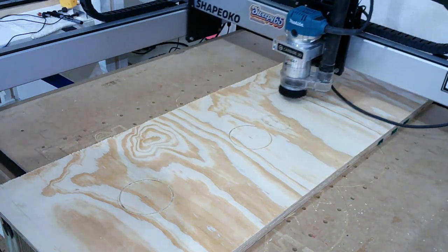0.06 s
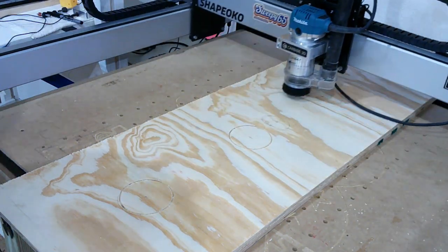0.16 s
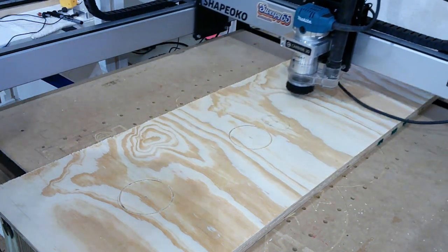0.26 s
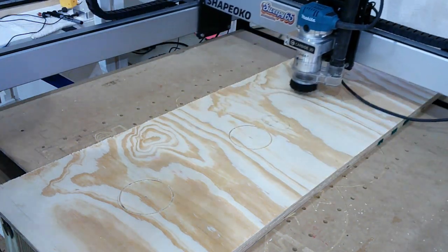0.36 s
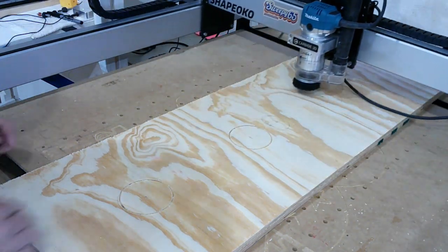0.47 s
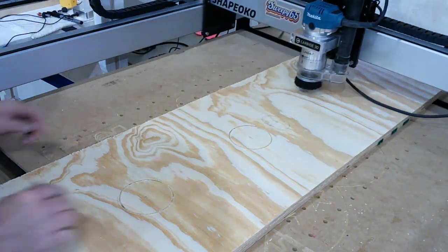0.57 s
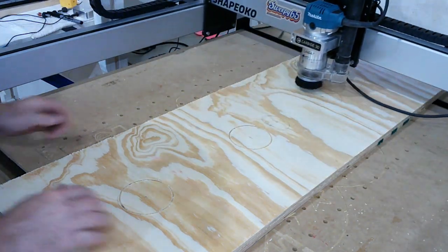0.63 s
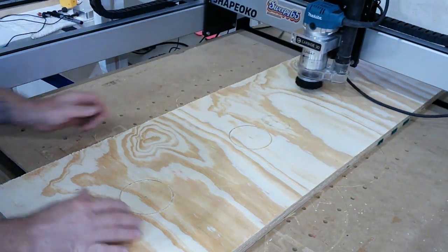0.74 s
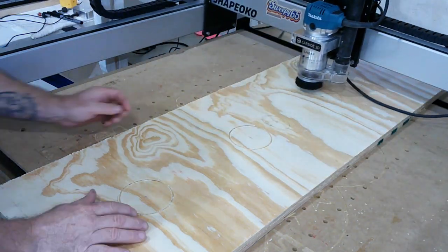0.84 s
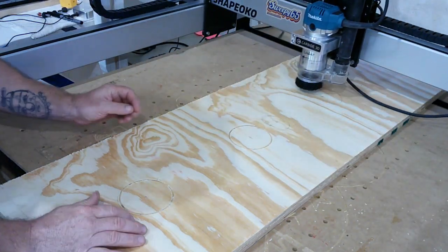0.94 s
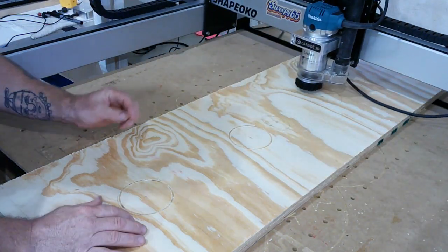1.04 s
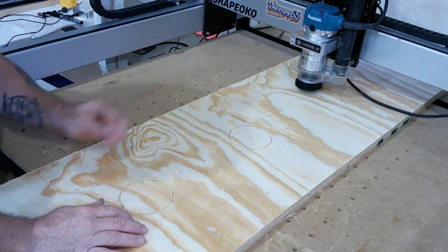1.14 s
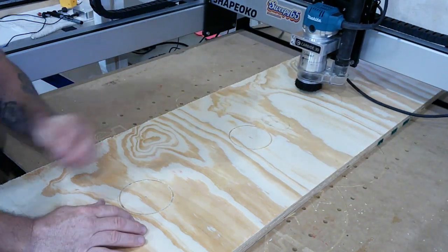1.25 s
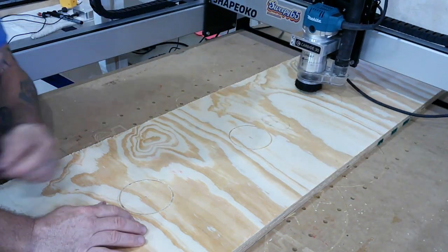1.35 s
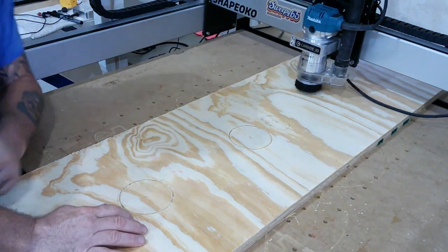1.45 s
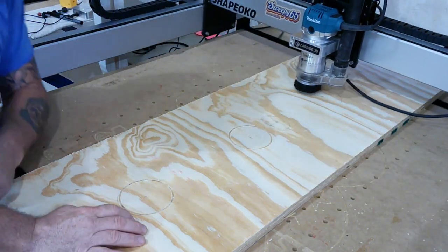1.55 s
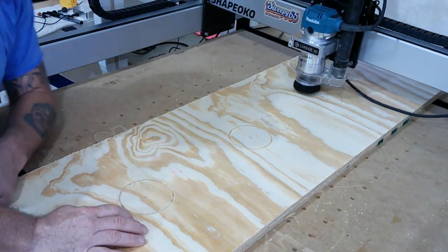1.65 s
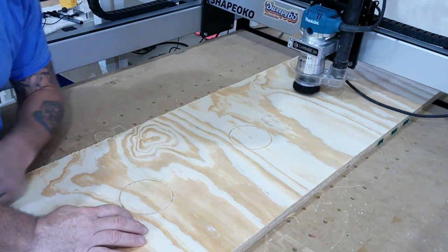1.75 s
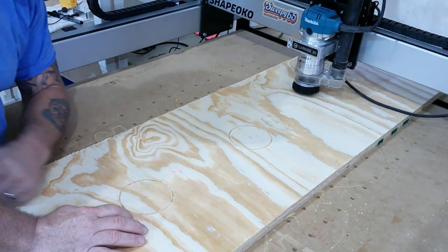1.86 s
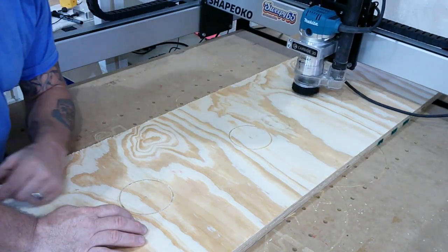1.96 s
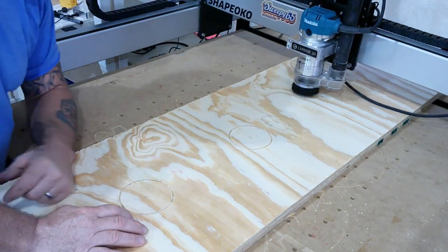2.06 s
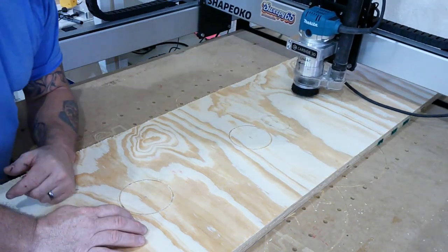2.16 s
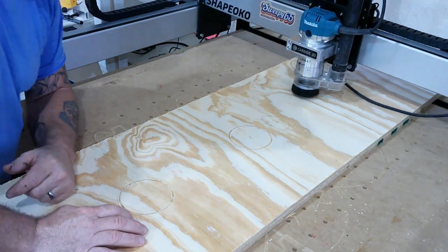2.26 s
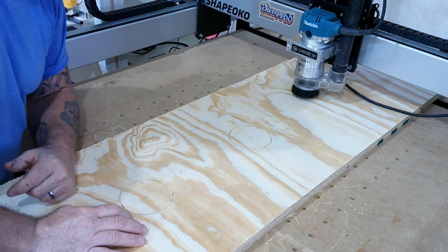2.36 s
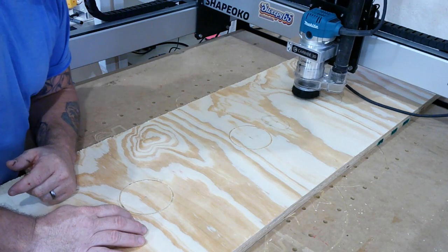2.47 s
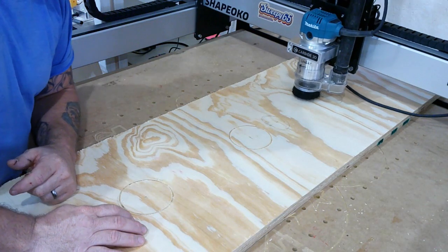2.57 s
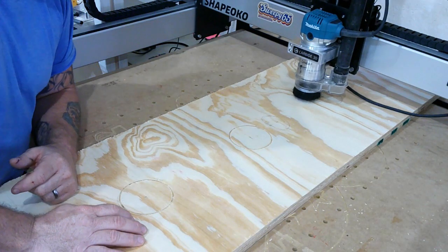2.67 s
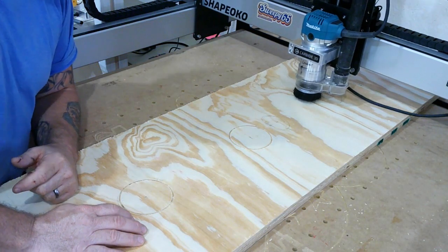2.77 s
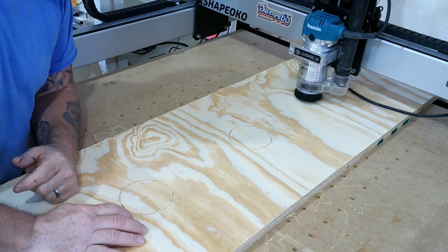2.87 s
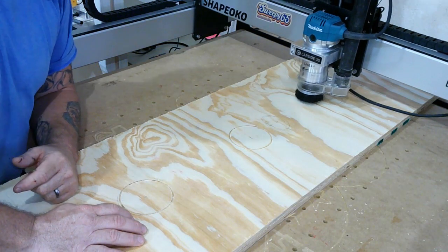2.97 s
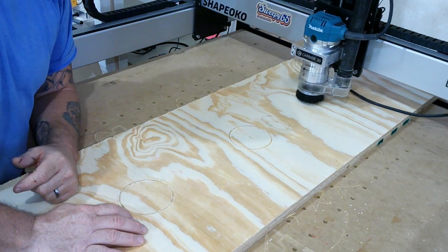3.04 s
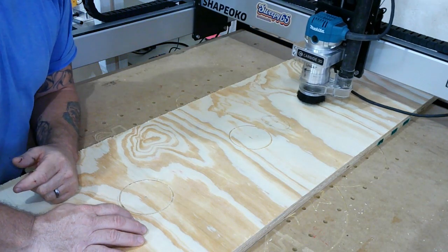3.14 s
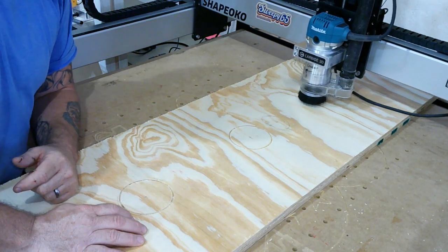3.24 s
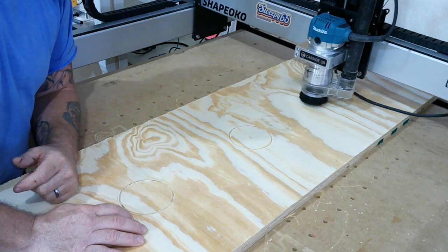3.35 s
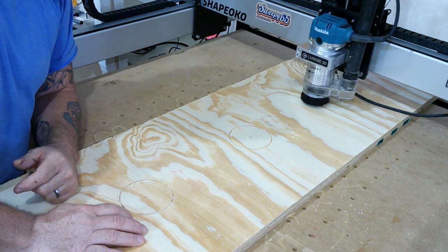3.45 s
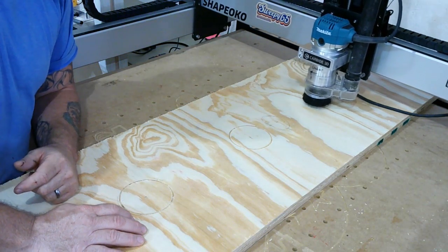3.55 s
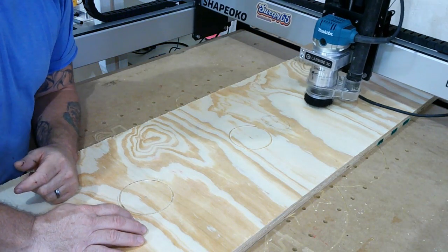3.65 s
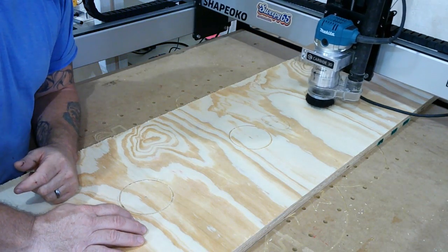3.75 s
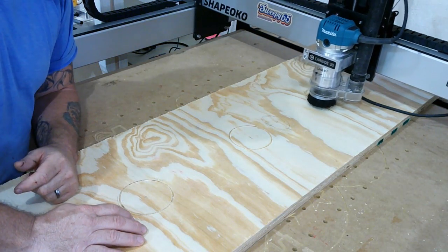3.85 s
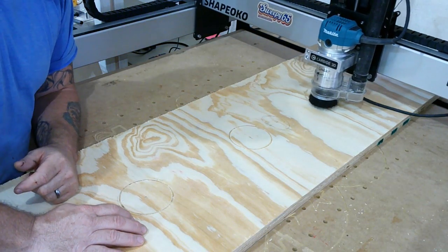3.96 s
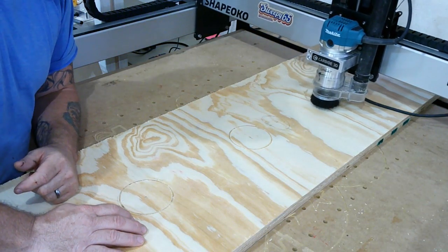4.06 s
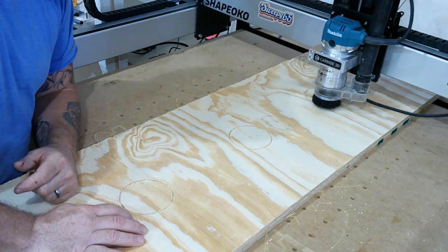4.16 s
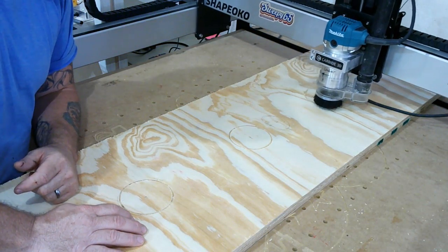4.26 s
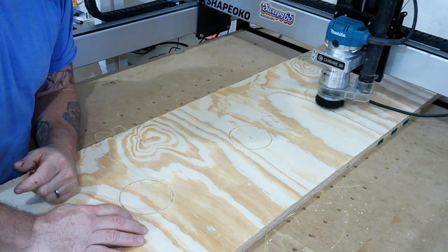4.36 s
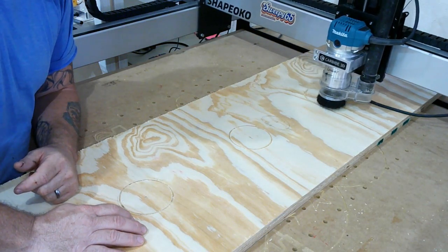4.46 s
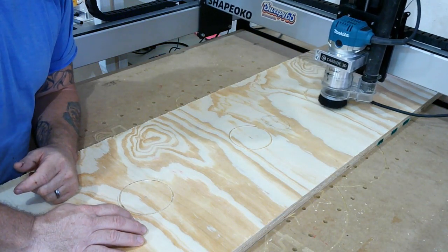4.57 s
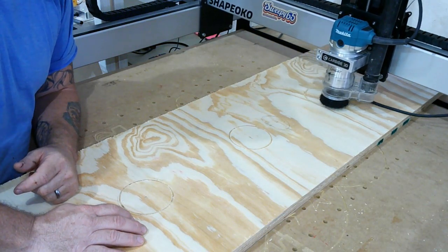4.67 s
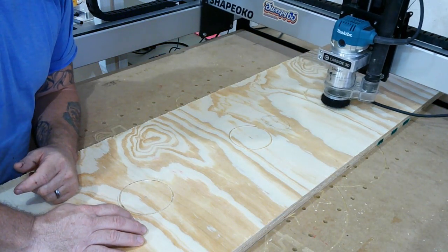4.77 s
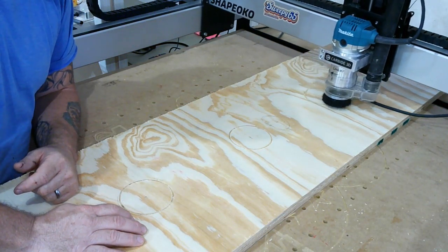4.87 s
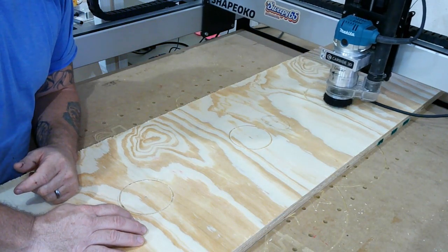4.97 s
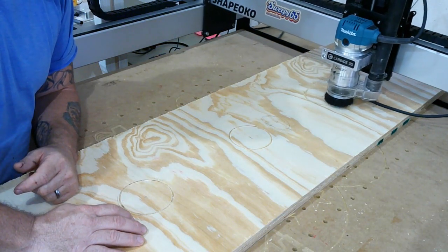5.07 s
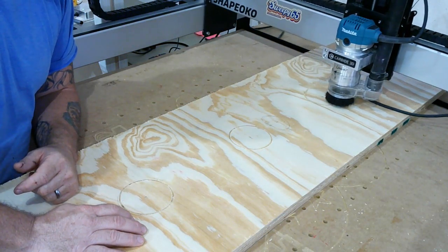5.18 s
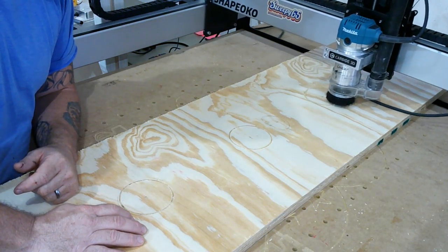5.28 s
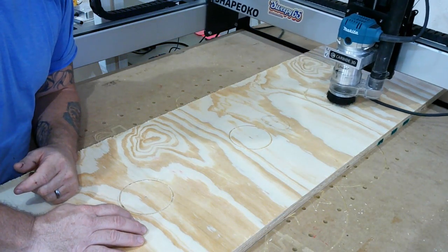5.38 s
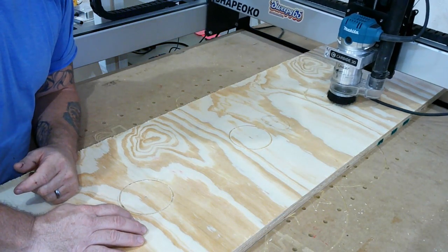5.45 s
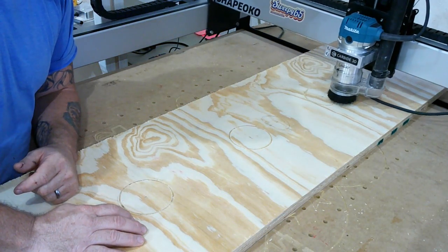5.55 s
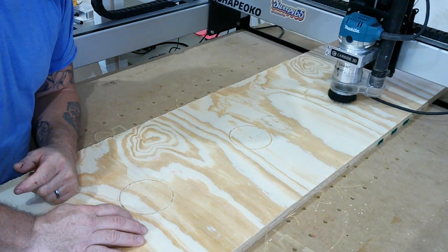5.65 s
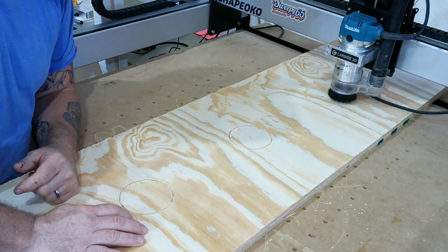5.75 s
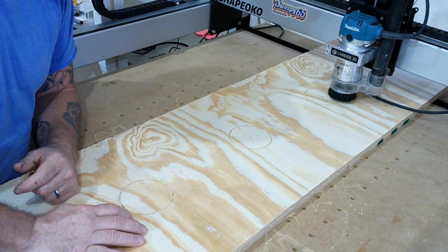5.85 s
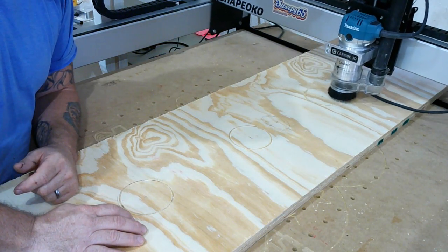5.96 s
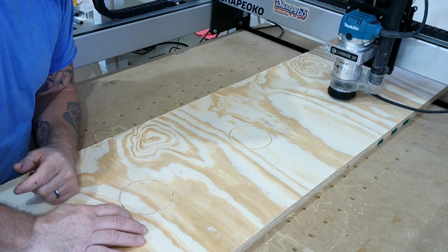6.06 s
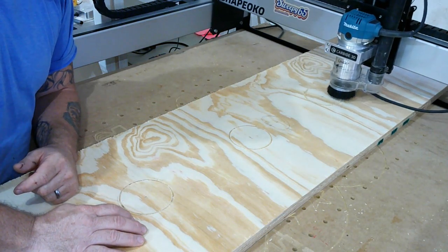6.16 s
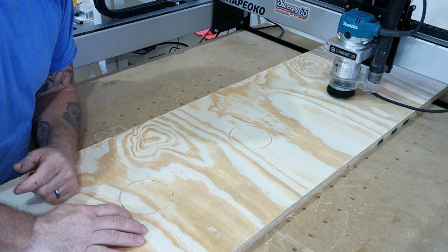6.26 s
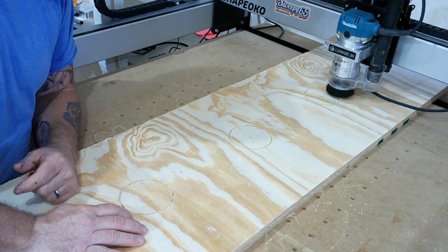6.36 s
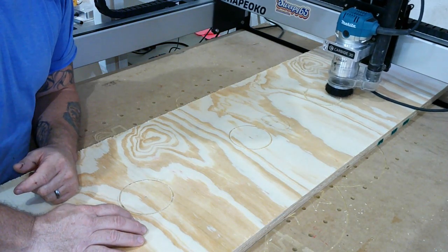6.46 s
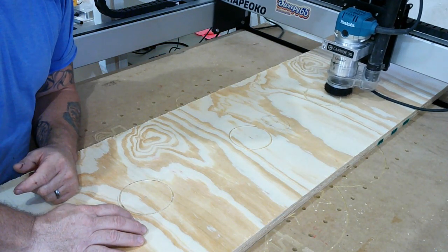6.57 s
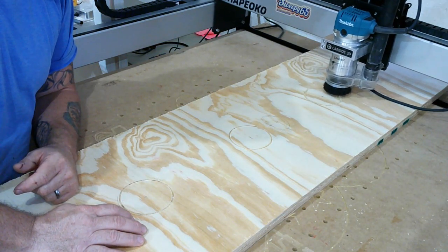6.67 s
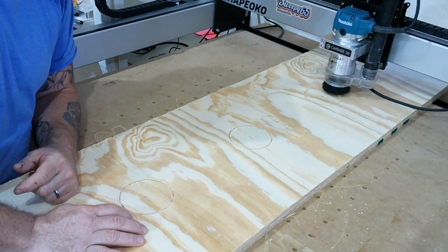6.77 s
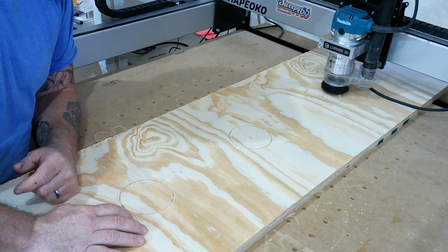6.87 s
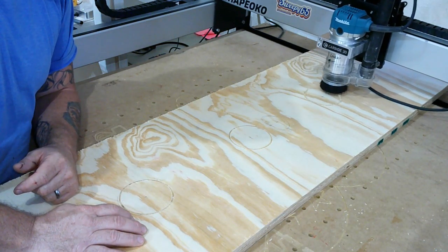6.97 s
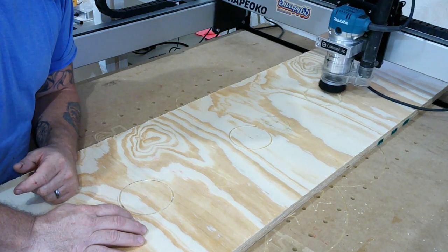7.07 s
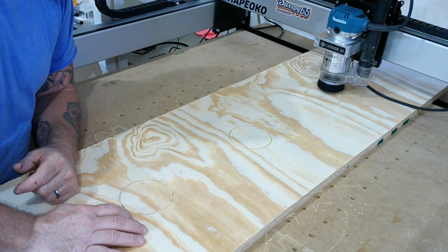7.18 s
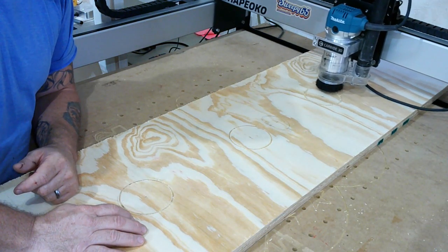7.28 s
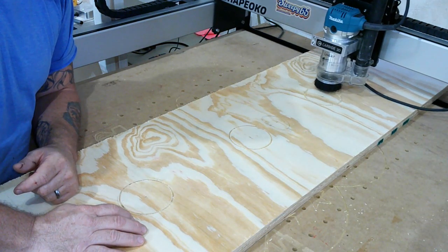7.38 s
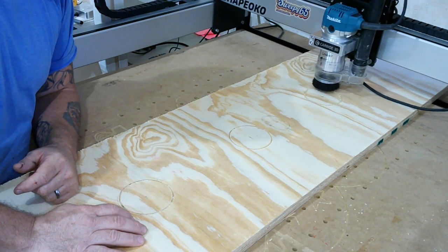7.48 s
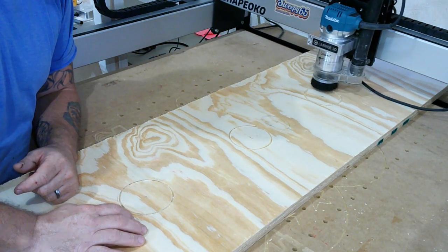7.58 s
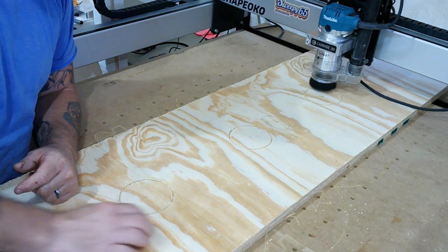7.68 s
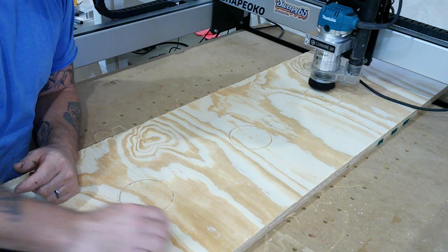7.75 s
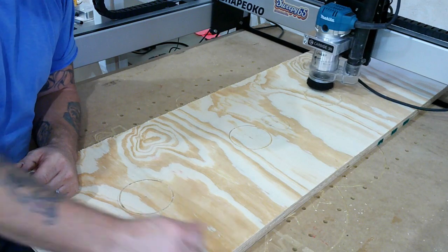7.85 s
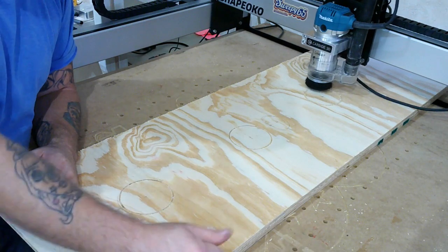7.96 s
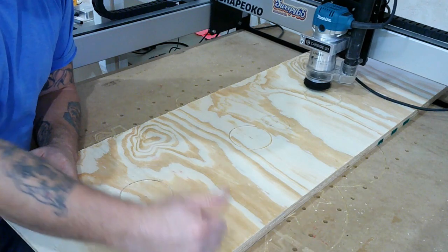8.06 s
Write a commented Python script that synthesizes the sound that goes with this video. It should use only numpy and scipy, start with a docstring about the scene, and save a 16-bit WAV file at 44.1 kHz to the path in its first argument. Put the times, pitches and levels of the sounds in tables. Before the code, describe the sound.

From 0 to 1.2 seconds a router spins free: a moderate airy fan roar with a wavering whine near 2.5 kHz, dipping briefly around 0.3, and a faint low hum. At about 1.3 to 1.55 the bit grazes plywood, giving quick stuttering growls while the pitch sags slightly. Around 1.6 it bites fully and becomes much louder: a rough buzzing drone on multiples of about 312 Hz, bright tearing hiss, hollow wooden ringing near 1.7 kHz and fluttering chatter near 4.2 kHz. A squeal stands out near 2.6; a faint moan near 3.4 is almost buried. Different tones swell in turn, with rougher tearing around 4.9, renewed shrill buzz at 5.6 to 6.3, and a strong midrange drone near 6.7. Cutting continues through 8.1 without stopping. Mono, close, limited treble, softly overloaded.

```python
"""A whining, airy motor roar: a hand router on a gantry idles over plywood, then grazes it and mills a ring.
Its two-flute bit sings multiples of the shaft speed, each swelling and fluttering in its own way.
Once it bites, chatter squeals and buzzes near 4.2 kHz, fibres tear as shaped noise and the sheet rings hollow.
Behind lie fan noise, a steady hum and a short gantry moan; a narrow-band microphone overloads softly."""
import sys
import numpy as np
from scipy import signal
from scipy.io import wavfile
from scipy.ndimage import uniform_filter1d

SR = 44100
rng = np.random.default_rng(int(sys.argv[2]) if len(sys.argv) > 2 else 0)


def int16_out(signal):
    """Quantize to a 16-bit WAV file."""
    q = np.round(np.clip(np.atleast_2d(signal).T, -1, 1) * 32767)
    wavfile.write(sys.argv[1], SR, q.astype(np.int16))


def rack_gain(trim_db):
    """Turn a fader trim in dB into the linear factor to multiply a signal by."""
    fader = np.asarray(trim_db, float)
    return 10 ** (fader / 20)


N = 358091
T = np.arange(N) / SR


def evened(x):
    """Scales to rms 1."""
    return x / np.sqrt(np.mean(abs(x) ** 2) + 1e-20)


def curves(rows):
    """Joins the columns of a table by straight lines in time; the first column is seconds."""
    s, *columns = np.transpose(rows)
    return [np.interp(T, s, column) for column in columns]


def turning(hz):
    """Phase in radians of a frequency curve."""
    return 2 * np.pi * np.cumsum(hz) / SR


def wander(rate_hz):
    """Complex random drift of rms 1: a bell-shaped band reaching about rate_hz either side of zero."""
    hop = 64
    hz = np.fft.fftfreq(N // hop + 2, hop / SR)
    real, imag = rng.standard_normal((2, len(hz)))
    drift = evened(np.fft.ifft((real + 1j * imag) * np.exp(-(hz / rate_hz) ** 2)))
    at = np.arange(len(hz)) * hop / SR
    return np.interp(T, at, drift.real) + 1j * np.interp(T, at, drift.imag)


def bell(peak_s, half_s):
    """A smooth rise and fall around a moment, down to 1/e at half_s either side."""
    return np.exp(-((T - peak_s) / half_s) ** 2)


def bouts(rows, rest):
    """Adds bell-shaped bouts to resting levels; the pitch leans to whichever is loudest."""
    peak_s, half_s, hz, *levels_db = np.transpose(rows)
    rest_hz, *rest_db = rest
    shape = np.array([bell(a, b) for a, b in zip(peak_s, half_s)])
    gains = [rack_gain(low_db) + rack_gain(db) @ shape for low_db, db in zip(rest_db, levels_db)]
    weighted_hz = rack_gain(rest_db[0]) * rest_hz + (rack_gain(levels_db[0]) * hz) @ shape
    return weighted_hz / gains[0], *gains


def noise(spectrum, tilt_db, patchy_db):
    """Rms-1 noise from random short-time spectra, with drifting patches and a tilt around 3 kHz."""
    frames, hz = N // 256 + 5, np.fft.rfftfreq(1024, 1 / SR)
    real, imag, patches = rng.standard_normal((frames, 513, 3)).T
    patches = uniform_filter1d(patches, size=9, axis=0)
    patches = evened(uniform_filter1d(patches, size=40, axis=1))
    knot_hz, level_db = np.transpose(spectrum)
    shape_db = np.interp(np.log(hz + 1), np.log(knot_hz + 1), level_db)[:, None]
    octaves = np.log2(np.clip(hz, 500, 8000) / 3000)[:, None]
    tilt = np.interp(np.arange(frames) * 256, np.arange(N), tilt_db) * octaves
    spectra = (real + 1j * imag) * rack_gain(shape_db + tilt + patchy_db * patches)
    return evened(signal.istft(spectra, nperseg=1024, noverlap=768)[1][:N])


# the shaft sags as the bit bites, then holds nearly steady: start_s [s], shaft_hz [Hz]
SHAFT_SPEED = [(1.41, 312.3), (1.46, 310), (1.53, 311.3), (1.61, 308.5), (1.72, 312.3), (2.7, 313),
               (3.3, 312.2), (4, 312.6), (4.76, 311.8), (5.2, 312.8), (5.45, 311.7), (7, 313), (7.37, 312),
               (8.12, 312.2)]


def shaft_phase():
    """Angle of the turning shaft, which every multiple and flute follows."""
    return turning(curves(SHAFT_SPEED)[0])


# shaft multiples 2 to 12 of the bit spinning free, before flicker: level_db [dB]
FREE_DB = [-52.5, -46.5, -59, -50, -64, -52, -64, -56, -53.5, -62.5, -57]
# the steady part of the same multiples while cutting, before flutter: level_db [dB]
CUTTING_DB = [-35, -47, -60.5, -53.5, -43.5, -51, -45, -49.5, -48, -57, -46]
# sheet and room favour one multiple, then another, as the bit travels; one list for each multiple 2 to 12:
# peak_s [s], half_length_s [s, to 1/e], level_db [dB]
SWELLS = [
    [(2.22, .42, -36), (3.44, 0.44, -31), (4.2, 0.23, -39.5), (5.0, .15, -45), (5.6, 0.41, -39.5),
     (6.65, 0.66, -29.5), (7.8, 0.52, -35)],
    [(1.94, 0.25, -40), (3.13, 0.17, -49.5), (4.27, 0.45, -38.5), (7.8, 0.88, -30)],
    [(1.6, 0.23, -40), (2.3, .7, -31), (3.85, 0.95, -33.5), (4.95, .18, -32.5), (5.45, 0.079, -37),
     (5.68, 0.35, -28), (6.75, 0.63, -24.5), (7.55, 0.24, -37)],
    [(2.23, 1.2, -44), (4.77, 0.79, -30.5), (5.15, 0.12, -40.5), (6.92, 0.19, -42), (8.1, 0.62, -37.5)],
    [(1.95, .25, -42.5), (2.79, .16, -36), (3.54, 0.3, -36), (3.96, 0.11, -30.5), (4.53, 0.29, -30),
     (5.2, .2, -44), (6.6, 0.33, -46.5), (7.05, .15, -46), (7.69, 0.35, -35.5)],
    [(1.8, .2, -44.5), (2.51, .16, -41), (4.31, .17, -40.5), (5.09, .26, -39.5), (5.9, 0.41, -46.5),
     (7.2, 0.47, -40)],
    [(3.35, 0.25, -43.5), (4.03, 0.12, -38), (4.6, 1, -40.5), (5.0, 0.088, -43), (6.53, 0.48, -34),
     (7.37, .22, -40)],
    [(2.32, 0.23, -35), (5.68, 0.98, -44), (8.05, 0.78, -43)],
    [(1.8, 0.55, -47), (4.6, 0.43, -51), (5.05, 0.11, -40), (6.55, .81, -41.5)],
    [(1.9, .4, -48), (5.8, 0.7, -49.5), (7.7, .4, -47.5)],
    [(2.25, .2, -48), (3.3, 0.24, -53), (4.3, 0.34, -45.5), (7.3, 0.32, -49.5)],
]


def multiple_levels(engaged):
    """Strength of multiples 2 to 12: flickering free spin gives way to the cut and its swells."""
    levels = []
    for free_db, cut_db, swells in zip(FREE_DB, CUTTING_DB, SWELLS):
        free = rack_gain(free_db) * abs(wander(rate_hz=7.5))
        cutting = rack_gain(cut_db) + sum(rack_gain(db) * bell(s, half_s) for s, half_s, db in swells)
        levels.append((1 - engaged) * free + engaged * cutting)
    return levels


# the descending bit touches the surface: start_s [s], decay_s [s], level_db [dB before the rise shapes it]
TOUCHES = [(1.3, 0.22, -47.5), (1.415, 0.018, -42), (1.443, 0.022, -30), (1.475, 0.025, -37),
           (1.51, 0.022, -43), (1.555, 0.04, -28)]


def touch_level():
    """Quick swells and decays as the bit meets the surface."""
    rise_s = 0.015
    level = 0
    for start_s, decay_s, level_db in TOUCHES:
        rise = np.clip((T - start_s) / rise_s, 0, 1)
        level = level + rack_gain(level_db) * rise * np.exp(-abs(T - start_s) / decay_s)
    return level


# fan-blade whine on the 8th multiple, fading under the cut: start_s [s], level_db [dB before flutter]
WHINE = [(0, -40), (.12, -36), (.3, -49), (.55, -37), (1.22, -34.5), (1.5, -38.5), (1.75, -39.5),
         (2.4, -53), (8.12, -61.5)]


def whine_level():
    """Extra strength the fan blades lend to the 8th multiple."""
    return rack_gain(curves(WHINE)[0])


def bit_tones(shaft, engaged):
    """The bit sings multiples 2 to 12 of the shaft turn; higher ones flutter more."""
    levels = multiple_levels(engaged)
    touch = touch_level()
    for k, answer_db in enumerate([2, -7, -10.5]):  # multiples 2 to 4 answer each touch
        levels[k] = levels[k] + rack_gain(answer_db) * touch
    rubbing = (T > 1.24) & (T < 1.56)  # rubbing the surface lifts the 12th multiple
    levels[-1] = levels[-1] + rack_gain(-50) * rubbing
    levels[8 - 2] = levels[8 - 2] + whine_level()
    grazing = (T > 1.2) & (T < 1.55)
    skip = grazing * 0.24 * np.cos(2 * np.pi * 31 * (T - 1.453))  # the grazing bit skips on the surface
    out = np.zeros(N)
    for k, level in enumerate(levels, 2):
        flutter = 1 + 0.037 * k * wander(rate_hz=18) + 0.1 * wander(rate_hz=120) + skip * (k < 5)
        out += level * (flutter * np.exp(1j * (k * shaft + 7 * rng.random()))).real
    return np.sqrt(2) * out


# fainter multiples 13 to 20 while cutting, before flutter: level_db [dB]
FAINT_DB = [-47.5, -58.5, -55.5, -55, -56.5, -49.5, -49, -54.5]


def faint_tones(shaft, engaged):
    """High shaft multiples that flutter deeply and sit lower before the bit bites."""
    idle_drop_db = -11.5
    out = np.zeros(N)
    for k, level_db in enumerate(FAINT_DB, 13):
        fading = (0.86 + .5 * wander(rate_hz=4.1)) * (1 + 0.55 * wander(rate_hz=58))
        level = rack_gain(level_db + (1 - engaged) * idle_drop_db)
        out += level * (fading * np.exp(1j * k * shaft)).real
    return np.sqrt(2) * out


# out-of-balance tone at the shaft rate: start_s [s], level_db [dB before drift]
WOBBLE = [(0, -53), (.8, -57.5), (1, -79), (1.28, -59), (1.36, -50.5), (1.58, -46.5), (1.68, -64.5),
          (3.1, -58.5), (5.1, -53), (7.5, -53), (8.12, -60)]


def wobble_tone(shaft):
    """The out-of-balance shaft hums once a turn."""
    drift = 1 + 0.29 * wander(rate_hz=4)
    return np.sqrt(2) * rack_gain(curves(WOBBLE)[0]) * (drift * np.exp(1j * shaft)).real


# bouts of bit chatter, before throb and chopping: peak_s [s], half_length_s [s, to 1/e], pitch_hz [Hz],
# own_level_db [dB at the bit's own pitch], side_level_db [dB of its side tones]
CHATTER_BOUTS = [(1.7, .2, 4155, -38, -47.5), (2.1, .25, 4165, -43, -47.5), (2.58, .19, 4212, -30, -38),
                 (3.3, .2, 4149, -45, -57), (4.3, .2, 4230, -46.5, -54.5), (5.62, 0.0993, 4224, -39, -34),
                 (5.95, .3, 4193, -36, -41.5), (6.3, .25, 4190, -39, -40.5), (6.65, .2, 4210, -44, -43),
                 (7.15, .2, 4180, -38, -60.5), (7.7, .4, 4240, -47, -60)]
# flutes chop chatter into tones one flute rate apart, steps -5 to +4 from the bit's own pitch:
# squeal_db [dB], buzz_db [dB], both relative gains
CHOPS = [(-7.5, 0.5), (-6.5, -1), (-14.5, -8), (-3.5, 1), (-5, 1), (-1.2, 0.5), (-1, -4), (-6, -7.5),
         (-2.3, -4.5), (-8, -6.5)]


def chatter(shaft, engaged):
    """The bit rings at its bending pitch, a narrow squeal in a wide buzz, chopped by the two flutes."""
    calm = (4257, -55, -49)  # between bouts: Hz, own level dB, side level dB
    hz, own, sides = bouts(CHATTER_BOUTS, calm)
    squeal = np.exp(1j * turning(hz))
    buzz = rack_gain(-44) * np.exp(2j * np.pi * 4270 * T)
    # the chatter beats near 16 Hz as the feed steps along
    beat = np.cos(turning(16 * (1 + .12 * wander(rate_hz=2.0).real)))
    common, out = wander(rate_hz=48), np.zeros(N)
    for step, (squeal_db, buzz_db) in enumerate(CHOPS, -5):
        # the room scrambles each side tone its own way
        throb = 0.33 * (1 + .6 * beat) + 0.42 * common + 0.72 * wander(rate_hz=30)
        narrow = rack_gain(squeal_db) * (sides if step else own) * throb * squeal
        wide = rack_gain(buzz_db) * wander(rate_hz=150) * buzz
        drift = rack_gain(1.2 * wander(rate_hz=2.7).real)
        out += drift * ((narrow + wide) * np.exp(2j * step * shaft)).real  # two flutes a turn
    return np.sqrt(2) * engaged * out


# the cut: start_s [s], level_db [dB of tearing noise before its pulse and fade-in],
# brightness_db [dB per octave around 3 kHz]
CUT = [(1.2, -38.5, -0.5), (1.54, -36.5, 0), (1.62, -30, 2), (2.65, -31, 3), (2.9, -32.5, -0.5),
       (3.6, -30, 3), (4.2, -33, 1.5), (4.9, -27.5, 1.5), (5.15, -29, 4), (5.27, -32, 2), (5.6, -30, 5.5),
       (6.4, -28.5, 2.5), (7, -30.5, 4), (7.6, -32, 3), (8.12, -27.5, 1)]
# spectrum of torn fibres before tilt: pitch_hz [Hz], level_db [relative dB per Hz]
TEAR_SPECTRUM = [(30, -33.5), (150, -24), (500, -11), (800, -10), (1200, 5), (1450, -3), (2000, 2),
                 (3000, 0.5), (4500, -4.5), (5200, -8), (6200, 0), (7300, -10.5)]


def tearing(shaft):
    """Torn fibres hiss; one flute cuts deeper, so the noise pulses once a turn."""
    level_db, brightness_db = curves(CUT)
    fade_in = np.interp(T, [1.1, 1.3], [0, 1])
    pulse = 1 + .1 * np.cos(shaft)
    return fade_in * rack_gain(level_db) * pulse * noise(TEAR_SPECTRUM, brightness_db, patchy_db=1.5)


# the sheet rings hollow under the bit: peak_s [s], half_length_s [s, to 1/e], pitch_hz [Hz],
# level_db [dB before the breathy drift]
HOLLOWS = [(1.6, 0.2036, 1725, -34.5), (2.1, .22, 1703, -32.5), (3.0, .3, 1780, -37.5),
           (3.65, .35, 1745, -31.5), (4.15, .2, 1763, -40.5), (6.5, 0.32, 1702, -39),
           (7.62, .18, 1755, -35), (8.05, .3, 1715, -40.5)]


def sheet(engaged):
    """A breathy resonance of the plywood that shifts as the bit travels."""
    hz, level = bouts(HOLLOWS, (1701, -47))  # resting Hz and dB
    return engaged * level * (wander(rate_hz=210) * np.exp(1j * turning(hz))).real


# motor fan spectrum: pitch_hz [Hz], level_db [relative dB per Hz]
AIR_SPECTRUM = [(30, -43), (120, -29.5), (240, -16), (500, -11), (950, -5), (2200, -5.5), (2800, -8.5),
                (4200, -20.5), (5200, -23.5), (6200, -13.5), (7300, -22)]


def motor_air():
    """The fan's air roar: shaped noise whose level drifts slightly."""
    level = rack_gain(-35 + 0.2 * wander(rate_hz=1.2).real)
    return level * noise(AIR_SPECTRUM, np.zeros(N), patchy_db=2.0)


# gantry drive moan: start_s [s], pitch_hz [Hz], level_db [dB before drift]
MOAN = [(3.25, 500, -70), (3.45, 473, -46), (3.9, 473, -67)]


def gantry_moan():
    """The gantry drive moans briefly, a gliding tone with a drifting level."""
    hz, level_db = curves(MOAN)
    drift = 1 + 0.51 * wander(rate_hz=7.4)
    return np.sqrt(2) * (rack_gain(level_db) * drift * np.exp(1j * turning(hz))).real


def workshop_hum():
    """Constant low hum of the workshop, a narrow band around 234.5 Hz."""
    return np.sqrt(2) * rack_gain(-62) * (wander(rate_hz=4) * np.exp(2j * np.pi * 234.5 * T)).real


def scene():
    """The bit spins free, grazes the sheet, then bites fully."""
    shaft = shaft_phase()
    engaged = np.interp(T, [1.2, 1.55, 1.59], [0, .12, 1])
    router = bit_tones(shaft, engaged) + faint_tones(shaft, engaged) + wobble_tone(shaft)
    cut = chatter(shaft, engaged) + tearing(shaft) + sheet(engaged)
    background = motor_air() + gantry_moan() + workshop_hum()
    return (router + cut + background)[None]


def roll_off(x):
    """The treble ends steeply here."""
    return signal.sosfilt(signal.butter(12, 9230, fs=SR, output="sos"), x)


def record(dry):
    """Soft overload, a steep band limit, and the faint mirror image a low sampling rate leaves above it."""
    ceiling, bias = .17, .03
    limited = ceiling * np.tanh(abs(dry / ceiling) ** 5) ** (1 / 5) * np.sign(dry)
    over = limited + bias * dry ** 2  # lopsided overload
    over = signal.sosfilt(signal.butter(1, 20, "high", fs=SR, output="sos"), over)
    edge = signal.firwin(2001, 7265, window=("kaiser", 9), fs=SR)
    kept = signal.oaconvolve(over, edge[None], "same")
    skirt = signal.firwin(161, [8300, 8700], window=("kaiser", 9), pass_zero=False, fs=SR)
    folded = kept * np.cos(2 * np.pi * 16000 * T)  # mirrors the band about 8 kHz
    mirror = signal.oaconvolve(folded, skirt[None], "same")
    return roll_off(kept + rack_gain(-17.5) * mirror)


dry = scene()
out = record(dry)
int16_out(out)
```